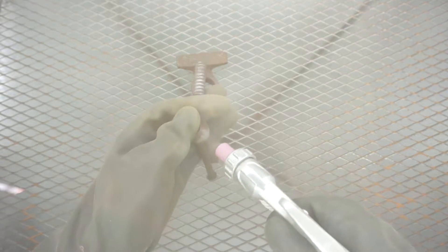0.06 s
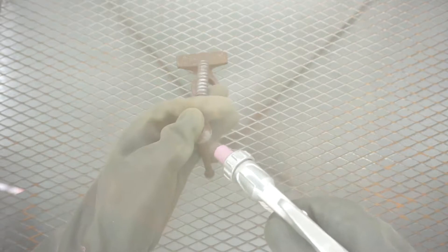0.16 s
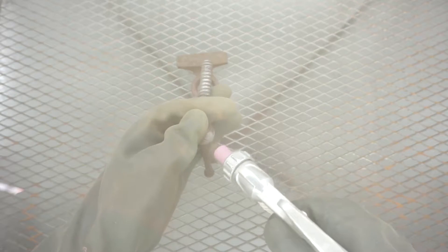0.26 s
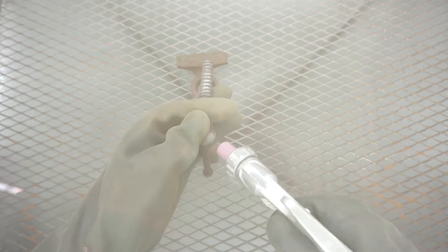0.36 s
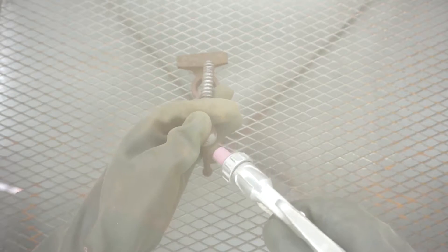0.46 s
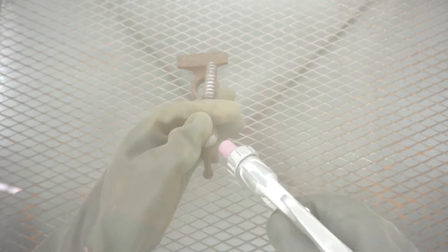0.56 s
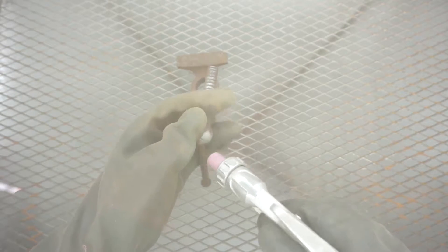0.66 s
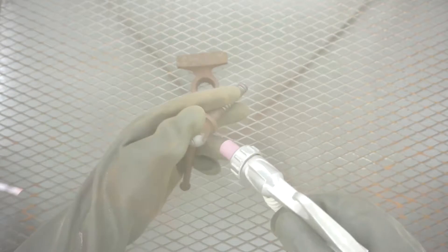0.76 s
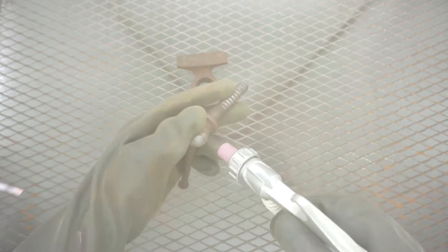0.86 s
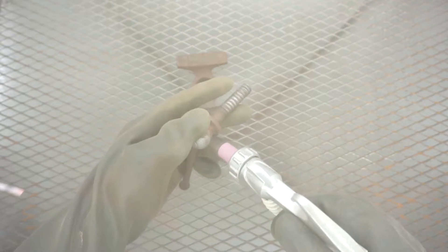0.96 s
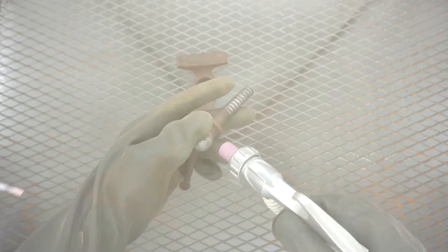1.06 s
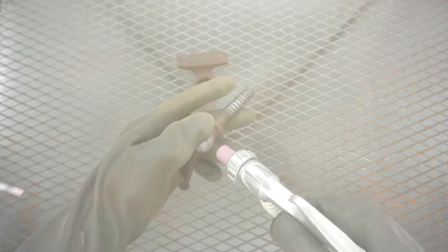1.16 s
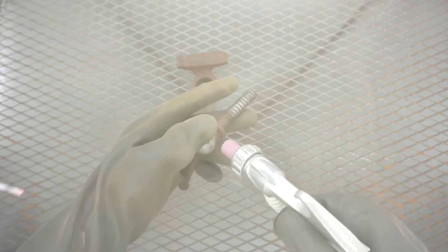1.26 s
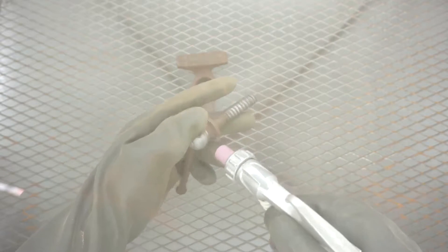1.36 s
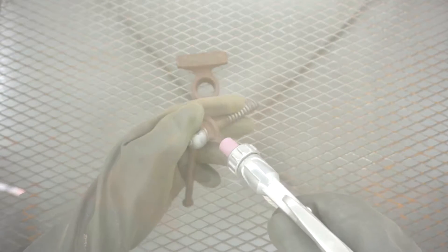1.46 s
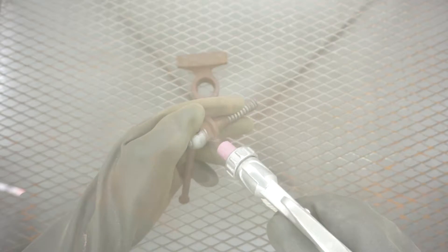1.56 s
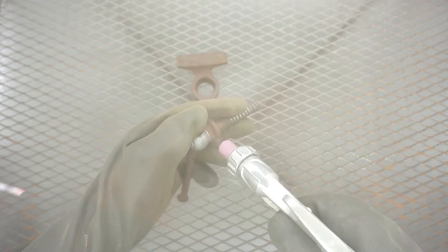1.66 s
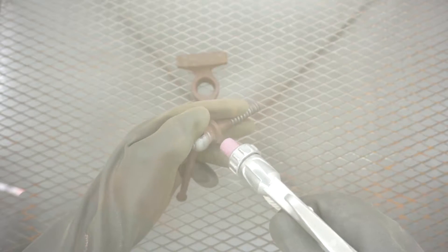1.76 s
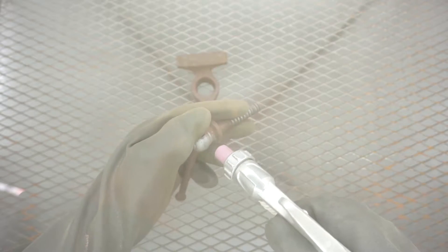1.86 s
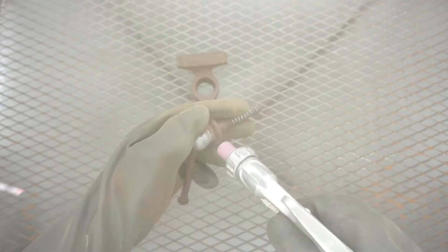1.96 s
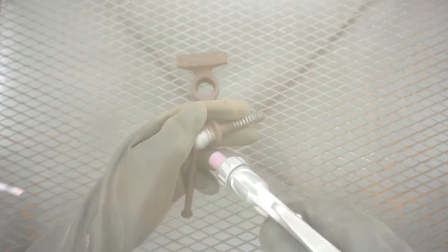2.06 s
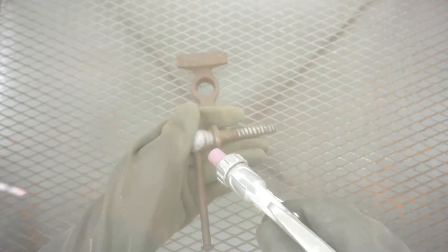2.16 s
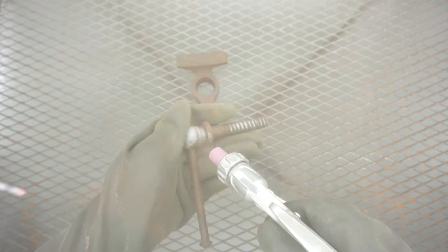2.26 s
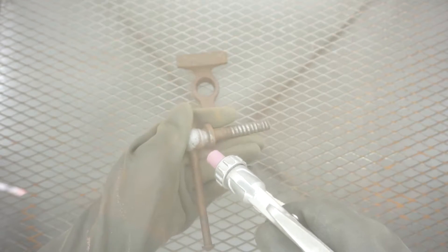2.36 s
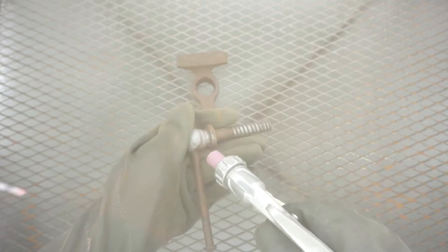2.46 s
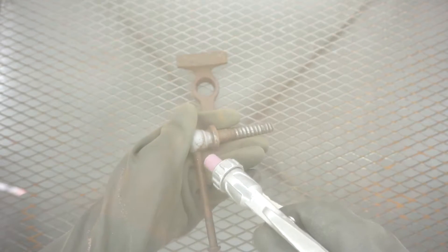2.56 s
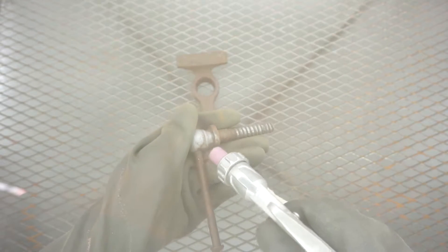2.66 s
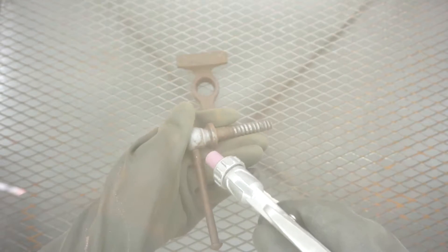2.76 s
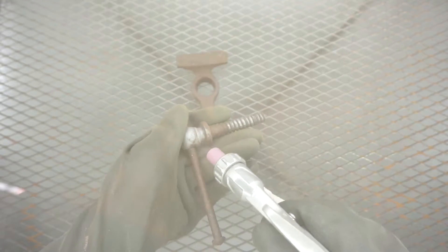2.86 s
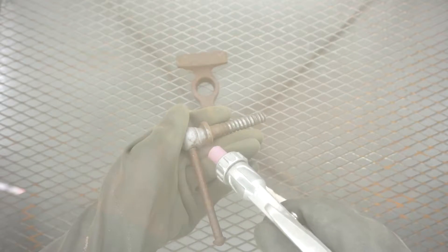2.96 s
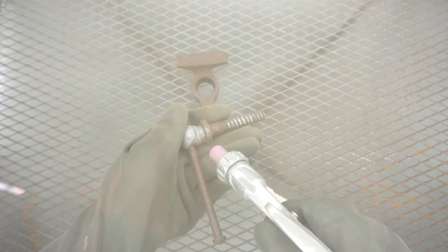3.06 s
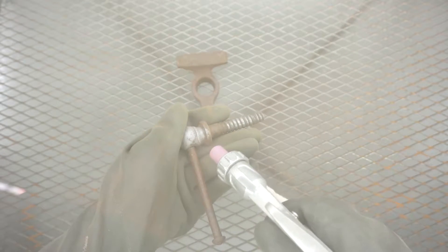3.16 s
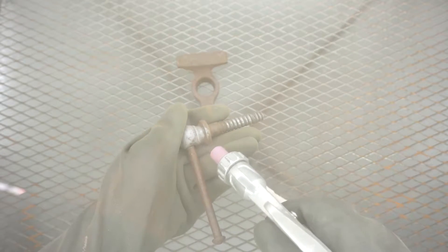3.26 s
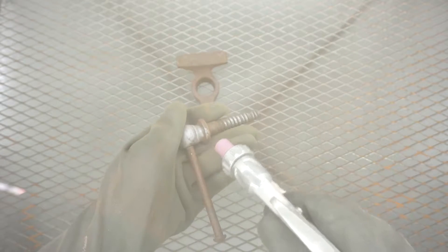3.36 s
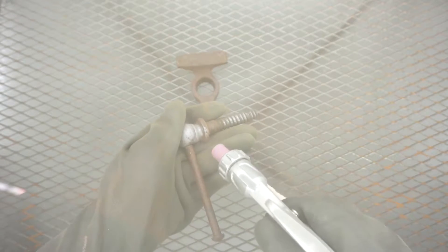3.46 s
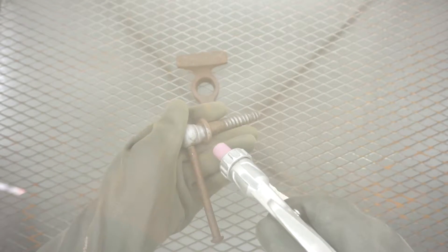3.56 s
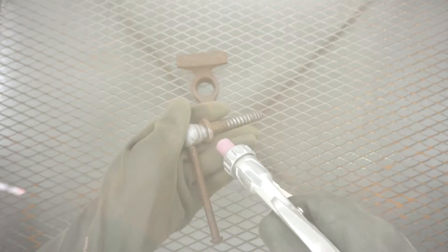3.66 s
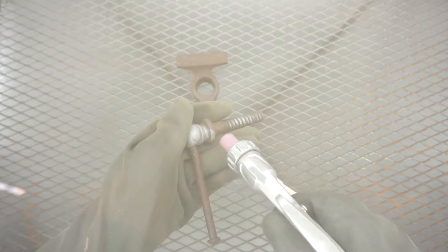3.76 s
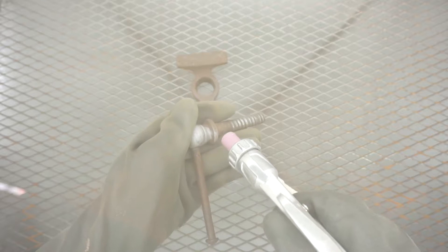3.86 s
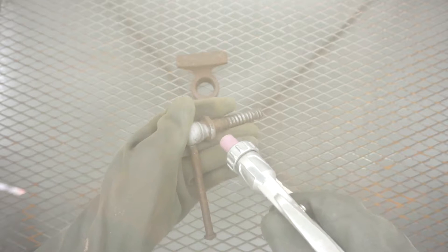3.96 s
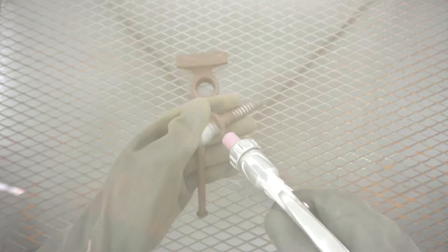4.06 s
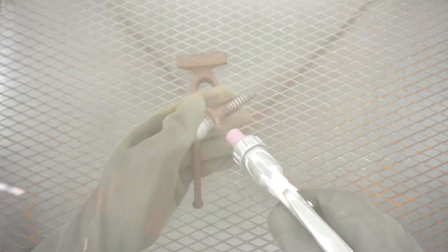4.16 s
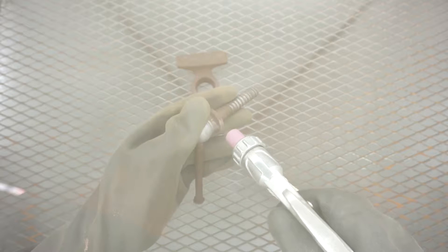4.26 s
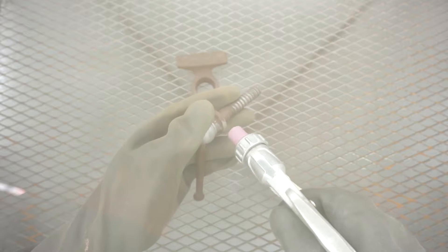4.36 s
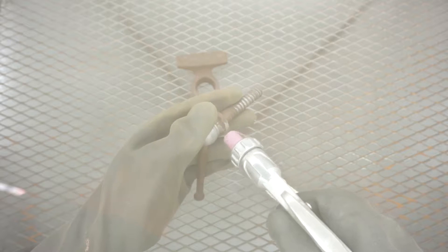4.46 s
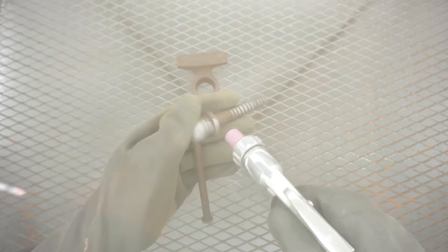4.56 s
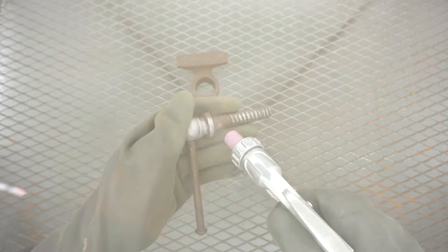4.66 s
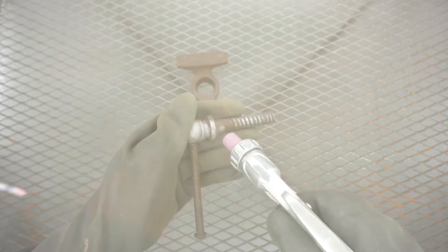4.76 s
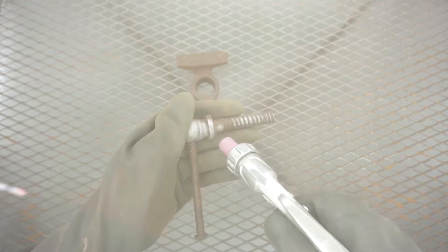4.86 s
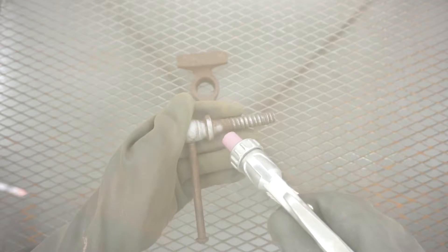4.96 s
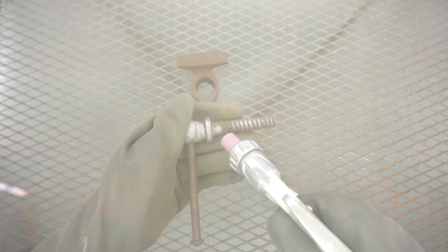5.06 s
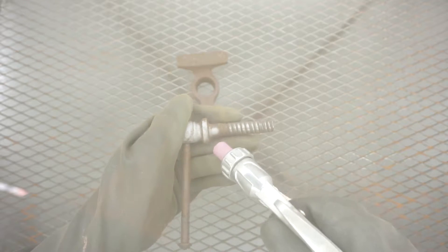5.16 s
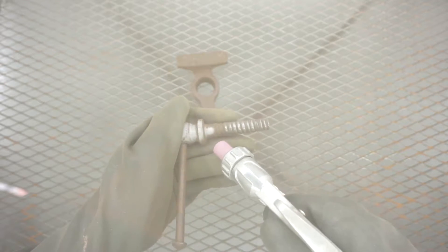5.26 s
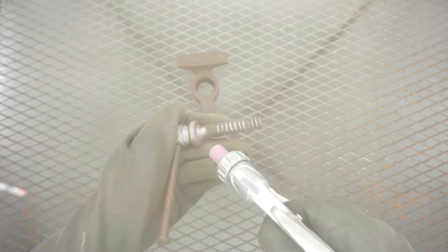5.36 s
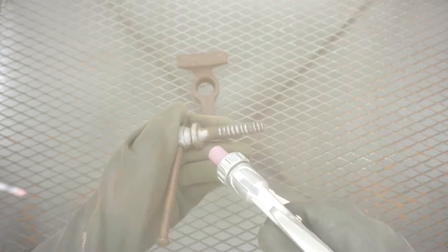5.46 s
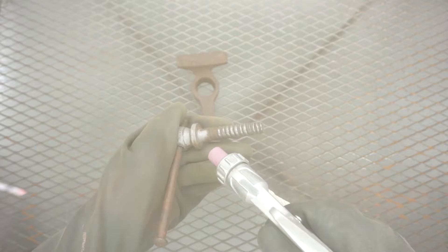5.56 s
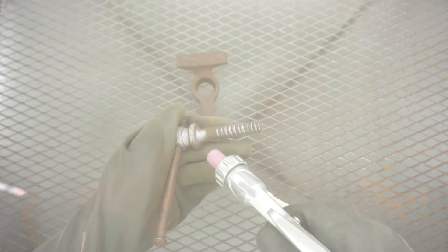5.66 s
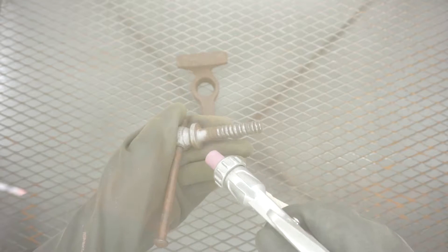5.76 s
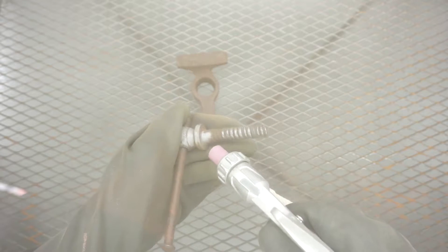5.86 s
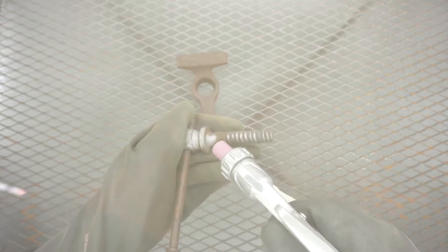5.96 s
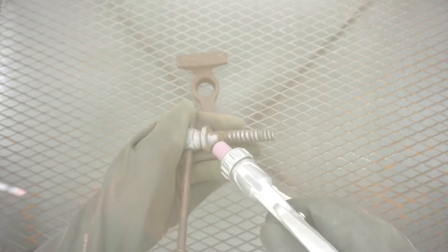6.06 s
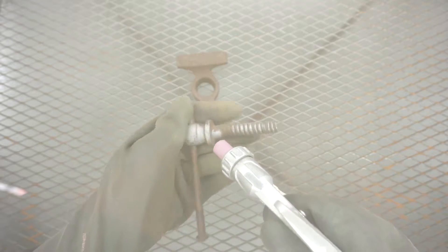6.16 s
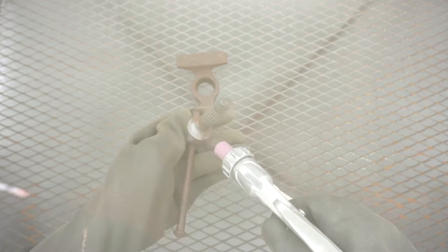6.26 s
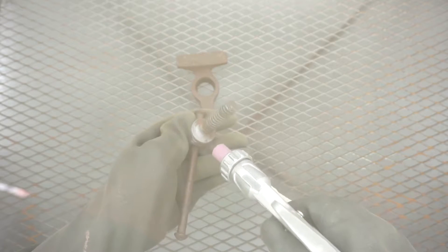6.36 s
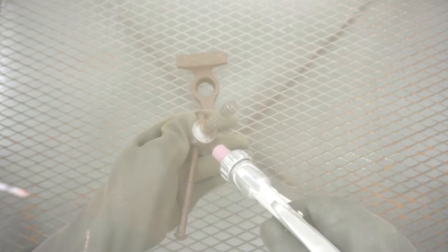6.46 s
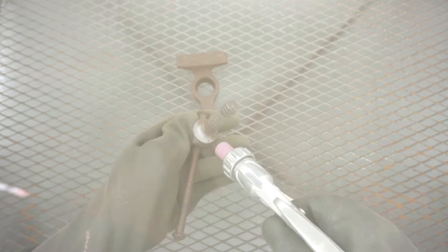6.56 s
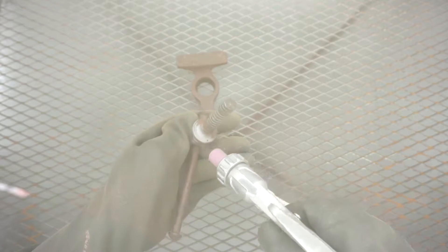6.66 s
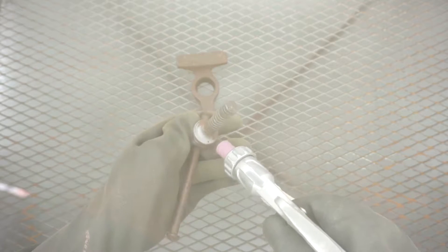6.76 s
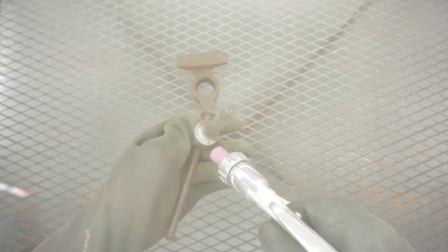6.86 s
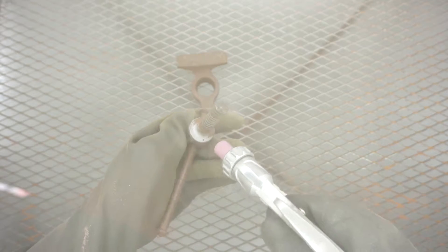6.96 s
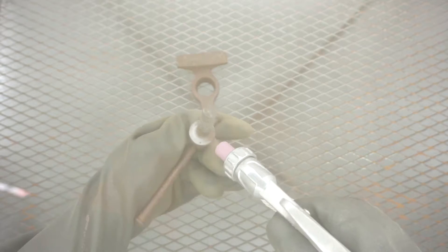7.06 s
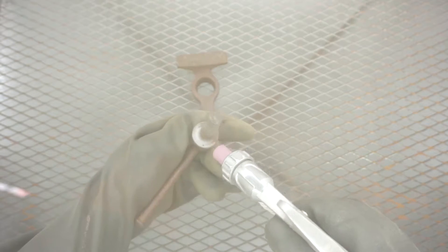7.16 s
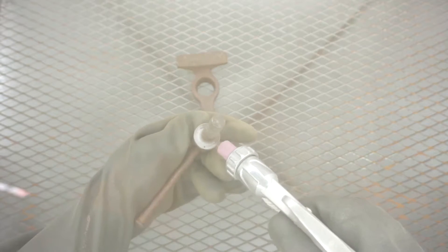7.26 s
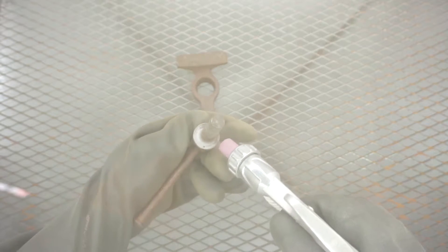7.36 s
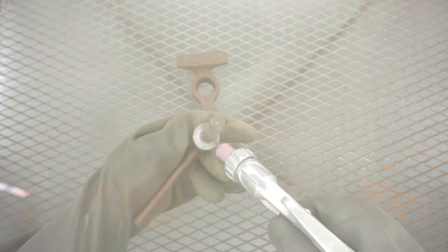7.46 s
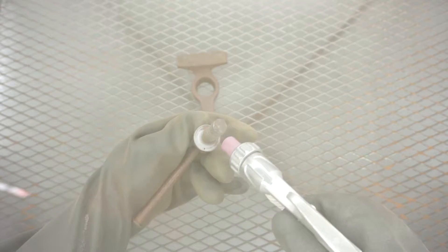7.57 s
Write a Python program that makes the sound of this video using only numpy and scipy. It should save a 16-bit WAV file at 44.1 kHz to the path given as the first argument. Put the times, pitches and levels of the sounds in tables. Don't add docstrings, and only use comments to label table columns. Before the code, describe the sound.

A close stereo pickup of sandblasting: dense high hiss from the nozzle, grit spattering on steel, and a softer rush underneath. The jet comes in joined bursts, each ending in a momentary sag before an abrupt return with a barely audible thud. Sweeps over the part make the splash flare and flicker, with slight whistling and ringing. A low fan and motor hum with dull airflow sits far below, in a small tight steel box.

```python
import sys
import numpy as np
from scipy import signal
from scipy.fft import rfft, irfft, next_fast_len
from scipy.io import wavfile
from scipy.ndimage import uniform_filter1d, map_coordinates

SR = 44100
rng = np.random.default_rng(int(sys.argv[2]) if len(sys.argv) > 2 else 0)


def elevation(decibels):
    levels = np.asarray(decibels, float)
    return 10 ** (levels / 20)


def log_audio(samples):
    frames = np.atleast_2d(samples).T
    limited = np.clip(frames, -1, 1)
    pcm = np.round(limited * 32767).astype(np.int16)
    wavfile.write(sys.argv[1], SR, pcm)


N = 336042
SIZE = next_fast_len(N)
HZ = np.maximum(np.fft.rfftfreq(SIZE, 1 / SR), 1)
T = np.arange(N) / SR
SIDE = np.array([[1], [-1]])


def rms_one(x):
    return x / np.sqrt(np.mean(x ** 2) + 1e-20)


def mid_one(x):
    return x / np.std(x.mean(axis=0))


def at_hz(points, hz):
    table = np.array(points)
    return np.interp(np.log(hz), np.log(table[:, 0]), table[:, 1])


def drift(rate):
    knots = rng.standard_normal(400)
    coarse = map_coordinates(knots, [np.clip(T[::256] * rate + 2, 0, 398)], order=3)
    return np.interp(T, T[::256], coarse)


def cabinet():
    t60_s = 0.14
    echoes = rng.standard_normal((2, SR // 2)) * elevation(-60 * T[:SR // 2] / t60_s)
    return rfft(echoes / np.linalg.norm(echoes, axis=1, keepdims=True), SIZE)


# frequency in Hz, direct share 0-1.
DIRECT_SHARE = [(30, 0.5), (60, 1), (200, 1), (600, 0.84), (1500, 0.77), (4000, 0.33), (5800, 0.37),
                (7000, 0.03), (7600, 0.45), (8600, 0.9), (10000, 0.02), (11500, 0), (14000, 0.13)]
# frequency in Hz, share 0-1.
ECHO_SHARE = [(300, 0.53), (2500, 0.99), (7000, 0.72), (14000, 0.3)]
# frequency in Hz, lag in radians.
LEFT_LAG = [(100, 0.17), (500, 0.77), (1800, 1.2), (2800, 1), (4000, 1.4), (6500, 2.56), (9500, 2.1),
            (14000, 1.9)]
# frequency in Hz, left over right in dB.
LEFT_OVER_RIGHT = [(60, -2), (110, 0), (200, -2), (380, 5.5), (750, 3.5), (1200, 4), (2380, 2.5), (4400, 4),
                   (8120, 3.5), (15000, 4)]


def stereo_noise(walls, rough_db=0, least_direct=0):
    top_hz = 15735
    grit = elevation(rough_db * rms_one(uniform_filter1d(rng.standard_normal(SIZE), 60)))
    shared, *own = rfft(rng.standard_normal((3, SIZE)) * grit)
    direct = np.clip(at_hz(DIRECT_SHARE, HZ), least_direct, 1)
    echo = np.clip(at_hz(ECHO_SHARE, HZ), 0, 1)
    around = np.sqrt(echo) * shared * walls + np.sqrt(1 - echo) * np.array(own)
    straight = shared * np.exp(-.5j * SIDE * at_hz(LEFT_LAG, HZ))
    both = np.sqrt(direct) * straight + np.sqrt(1 - direct) * around
    both = both / np.sqrt(uniform_filter1d(np.abs(both) ** 2, size=800))
    both = both * elevation(SIDE * at_hz(LEFT_OVER_RIGHT, HZ) / 2)
    pair = np.array([both[0] + both[1], both[0] - both[1]]) / 2
    broad = uniform_filter1d(np.abs(pair) ** 2, size=6000)
    fine = uniform_filter1d(np.abs(pair) ** 2, size=350)
    mid, apart = pair * np.sqrt(broad / broad[0] / fine)
    return (mid + SIDE * apart) * (HZ < top_hz)


# time the jet is back in seconds, how long before that it was let go in seconds,
# thud at the join in dB, then in the new burst grit on the part in dB and nozzle hiss in dB.
TRIGGER = [(0.027, 0.041, -88, 0, -1), (0.761, 0.044, -53, -2.5, -0.5), (1.479, 0.051, -73, 0, -1),
           (2.2291, 0.053, -84, -2.5, -1), (2.8967, 0.034, -64, -0.5, -1), (3.497, 0.052, -72, -1, -1.5),
           (4.1313, 0.05, -54, 0, -1.5), (4.666, 0.012, -73, -1.5, -0.5), (5.3664, 0.042, -64, -1, -0.5),
           (6.2497, 0.056, -71, -3.5, -1.5), (7.0844, 0.042, -78, -4, -1)]


def let_go():
    early_s = 0.004
    out = np.zeros(N)
    for back, lead, *_ in TRIGGER:
        lead = lead + early_s
        out = np.where((T > back - lead) & (T < back), T - back + lead, out)
    return out


# time in seconds, half length in seconds,
# more splash in dB, more rush and ringing in dB.
PASSES = [(0.41, 0.033, 4, 1.5), (0.67, 0.071, 0.5, -1.5), (0.897, 0.058, 3, 4.5), (1.184, 0.027, 5.5, 4.5),
          (1.343, 0.036, 5.5, 8.5), (1.82, 0.036, 6.5, 4), (2.034, 0.023, 2, 3.5), (2.393, 0.057, 1.5, 3.5),
          (2.743, 0.03, 2.5, 4.5), (3.095, 0.024, 5, 3.5), (3.297, 0.12, 2.5, 3), (3.774, 0.093, 4, 4.5),
          (3.957, 0.064, 5.5, 4.5), (4.504, 0.032, 4, 1.5), (5.13, 0.099, 3, 5.5), (5.604, 0.098, 1, 2),
          (6.075, 0.18, 0.5, 3), (6.495, 0.12, 1, 1), (6.68, 0.07, -0.5, 0), (6.96, 0.14, 2.5, 3.5),
          (7.456, 0.44, 5.5, 9)]


def aim():
    kick_db, kick_s = 2, 0.021
    build_up_db, build_up_s = 2, 0.083
    back, _, _, grit_db, hiss_db = np.transpose(TRIGGER)
    burst = np.maximum(np.searchsorted(back, T) - 1, 0)
    since = np.maximum(T - back[burst], 0)
    pressure_db = kick_db * np.exp(-since / kick_s) - build_up_db * np.exp(-since / build_up_s)
    coarse = T[::128]
    swell = np.zeros((2, len(coarse)))
    for s, half, splash_db, rush_db in PASSES:
        swell += np.outer([splash_db, rush_db], np.exp(-.5 * ((coarse - s) / half) ** 2))
    swell = np.array([np.interp(T, coarse, row) for row in swell])
    splash_db, rush_db = grit_db[burst] + pressure_db + swell
    return hiss_db[burst] + pressure_db, splash_db, rush_db


# time in seconds, edge tone in dB, more face turned to the jet in dB.
HOLD = [(0, -67, -2), (.4, -56.5, -2.5), (1.0, -68, 1.5), (1.5, -76, 0), (1.9, -58, -1.5), (2.4, -62, 0),
        (2.8, -59.5, -2.5), (3.1, -58, -1.5), (3.6, -53, -1), (3.95, -56.5, 0), (4.3, -61, -1),
        (4.62, -58, 0), (4.7, -58, -1), (4.93, -57, -2), (5.1, -57, -1.5), (5.5, -58.5, -1.5),
        (6.2, -57.5, 1), (6.7, -73, 0), (7.1, -65, -6.5)]


def held(column):
    hold = np.array(HOLD)
    return np.interp(T, hold[:, 0], hold[:, column])


FAN_HZ = 57.02
# multiple of the fan's turning rate, level in dB, left-right balance in dB.
FAN = [(2, -95, 1.5), (3, -91.5, -2), (4, -82.5, 2.5), (5, -80, 1), (6, -75, -5), (7, -71, 2.5),
       (8, -85.5, 10.5), (9, -85, -16), (10, -84, -3), (11, -73, -3), (13, -81, -1), (14, -85, -11),
       (15, -91.5, -13), (18, -104, -17), (19, -100.5, -2), (20, -99, -14)]
# frequency in Hz, level in dB.
MOTOR_LINES = [(183, -89.5), (706, -82), (904, -85.5)]


def fan_and_motor():
    skipped_s = np.cumsum(rng.uniform(0, 1, len(TRIGGER) + 1))
    burst = np.searchsorted(np.array(TRIGGER)[:, 0], T)
    turn = 2 * np.pi * (T + skipped_s[burst])
    lines = [(k * FAN_HZ, db, pan_db) for k, db, pan_db in FAN]
    lines += [(hz, db, 0) for hz, db in MOTOR_LINES]
    out = 0
    for hz, db, pan_db in lines:
        tone = np.cos(hz * turn + rng.uniform(0, 2 * np.pi) - SIDE / 2 * at_hz(LEFT_LAG, hz))
        level = elevation(db + 2.0 + 1.0 * drift(5))
        out = out + np.sqrt(2) * elevation(SIDE / 2 * pan_db) * level * tone
    return out


# frequency in Hz, level in dB per Hz.
AIRFLOW = [(25, -36), (45, -26), (65, -23), (140, -20.5), (260, -23), (310, -6), (380, 2), (430, -11),
           (600, -10.5), (705, -5), (800, -12), (950, -10.5), (1150, -37), (1600, -17)]


def airflow(walls, rush_db):
    follows = 0.83
    air = mid_one(irfft(stereo_noise(walls) * elevation(at_hz(AIRFLOW, HZ)), SIZE)[:, :N])
    stirred = rush_db + held(column=2)
    return elevation(-66 + follows * (stirred - stirred.mean()) + 0.46 * drift(8.2)) * air


def extractor(walls, rush_db):
    return fan_and_motor() + airflow(walls, rush_db)


def hum_gain_db(fading):
    back = np.array(TRIGGER)[:, 0]
    since = T - np.append(-1, back)[np.searchsorted(back, T)]
    opening_db = np.minimum(90 * fading, 3.0)
    ducking_db = 3.9 * np.exp(-since / 0.04)
    return uniform_filter1d(opening_db - ducking_db, 90)


def splices():
    out = np.zeros(N)
    for s, lead, thud_db, *_ in TRIGGER:
        near = slice(round((s - .01) * SR), round((s + .01) * SR))
        out[near] += elevation(thud_db - 15.0) * np.exp(-.5 * ((T[near] - s) / .0012) ** 2)
        out[round(s * SR):][:2] += elevation(lead * 400 - 62) * np.array([1, -1])
    return out


def standing_waves():
    depth_db, spacing_hz = 3.5, 45
    count = round(SR / 2 / spacing_hz)
    heights = rng.standard_normal(count + 1)
    return elevation(depth_db * np.interp(HZ / spacing_hz, np.arange(count + 1), heights))


def patchy_band(noise, lo_hz, hi_hz, patchy_db, together, tilt_db=0):
    edges = np.geomspace(lo_hz, hi_hz, num=4)
    step = np.log(edges[1] / edges[0])
    out = 0
    for k, centre in enumerate(np.sqrt(edges[1:] * edges[:-1])):
        strip = noise * np.cos(np.pi / 2 * np.clip(np.log(HZ / centre) / step, -1, 1))
        ridges = standing_waves()
        first = irfft(strip * ridges, SIZE)[:, :N]
        second = irfft(strip / ridges, SIZE)[:, :N]
        turned = np.clip(.5 + .9 * drift(1.5), 0, 1)
        level = elevation(patchy_db * (together + drift(14)) + (2 - k) * tilt_db)
        out = out + ((1 - turned) * first + turned * second) * level
    return mid_one(out)


def resonances(noise, modes):
    power = 0
    for hz, width, db in modes:
        power = power + elevation(2 * db) / width / (1 + (2 * (HZ - hz) / width) ** 2) ** 2
    return mid_one(irfft(noise * np.sqrt(power), SIZE)[:, :N])


# frequency in Hz, width in Hz, level in dB.
STEEL = [(1215, 17, 0), (1418, 16, -7), (1495, 26, -3), (1567, 19, 0), (1636, 12, -6), (1781.3, 34, 10),
         (1824, 23, -0.5), (1884, 13, 0.5), (1930, 22, -3), (2108, 23, -2.5), (2235, 30, -15)]


def ringing_steel(noise, low_db, fading):
    return elevation(-69.5 + low_db + 3.0 - 250 * fading + 0.2 * drift(9.5)) * resonances(noise, STEEL)


SPLASH_FADE_DB_S = 345
# frequency in Hz, width in Hz, level in dB.
EDGE_TONE = [(7000, 120, 0), (7090, 160, -1)]


def edge_whistle(noise, fading):
    level_db = held(column=1) + 0.83 * drift(7.0) - SPLASH_FADE_DB_S * fading
    return elevation(level_db) * resonances(noise, EDGE_TONE)


def rush(noise, together, low_db, fading):
    return elevation(-63.5 + low_db - 4.0 - 170 * fading) * patchy_band(noise, 730, 2037, 0.79, together)


# frequency in Hz, width in Hz, level in dB.
SPLASH_BANDS = [(2110, 52, -10), (2396, 40, -4.5), (2730, 47, -7), (2930, 33, -4), (2970, 31, -12),
                (3073, 25, -8.5), (3330, 28, -7), (3602, 28, 3.5), (3900, 93, 1), (4060, 130, 2.5),
                (4470, 120, 2.5), (5200, 100, 5), (5360, 86, 5), (5690, 140, 7), (5846, 58, 8),
                (6300, 170, -1.5), (7550, 140, -14)]


def splash(noise, other, together, high_db, fading):
    tilt_db = 0.15 * (high_db - high_db.mean())
    impacts = patchy_band(noise, 2286, 7200, 0.45, together, tilt_db)
    narrow_bands = elevation(-6.5 + 1.9 * drift(6.7)) * resonances(other, SPLASH_BANDS)
    level_db = -51.5 + 0.54 * high_db - 1.5 - SPLASH_FADE_DB_S * fading
    return elevation(level_db) * (impacts + narrow_bands)


# frequency in Hz, width in Hz, level in dB.
NOZZLE_BAND = [(13650, 350, -2), (14000, 700, 0)]


def nozzle_hiss(noise, other, together, nozzle_db, high_db, fading):
    spray = patchy_band(noise, 7330, 16180, 0.35, together)
    nozzle = elevation(-12 + 2.3 * drift(0.33)) * resonances(other, NOZZLE_BAND)
    fade_db = 346 * fading + 1700 * fading ** 2
    return elevation(-43 + nozzle_db + 0.062 * high_db + 1.0 - fade_db) * (spray + nozzle)


# frequency in Hz, level in dB per Hz.
JET = [(700, -29), (950, -30), (1400, -25), (2200, -16.5), (3000, -15.5), (4500, -14), (5500, -10),
       (6200, -11), (6700, -7), (7300, -8), (8500, -10.5), (9200, -9.5), (9700, -6), (11000, -4),
       (12600, -4.5), (13700, -1.0), (14600, -1.5), (15700, 1)]
# frequency in Hz, width in Hz, change in dB.
DIPS_AND_LIFTS = [(2570, 40, -2), (2687, 51, -6), (3530, 150, -4), (3640, 110, 0.5), (4060, 40, 4), (5350, 43, -7),
                  (6120, 200, 3.5)]


def jet(fading, walls, aimed):
    nozzle_db, high_db, low_db = aimed
    face_db = held(column=2)
    high_db, low_db = high_db + 0.77 * face_db, low_db + 1.0 * face_db
    colour_db = at_hz(JET, HZ)
    for hz, width, db in DIPS_AND_LIFTS:
        colour_db = colour_db + db * np.exp(-.5 * (2 * (HZ - hz) / width) ** 2)
    noise = stereo_noise(walls, rough_db=1.2) * elevation(colour_db)
    other = stereo_noise(walls, least_direct=0.59)
    together = 1.7 * drift(7.2)
    out = ringing_steel(other, low_db, fading) + edge_whistle(other, fading)
    out = out + rush(noise, together, low_db, fading)
    out = out + splash(noise, other, together, high_db, fading)
    return out + nozzle_hiss(noise, other, together, nozzle_db, high_db, fading)


def scene():
    fading, walls, aimed = let_go(), cabinet(), aim()
    background = elevation(hum_gain_db(fading)) * extractor(walls, aimed[2])
    return background + splices() + jet(fading, walls, aimed)


def top_cut(x):
    return signal.sosfilt(signal.butter(12, 16600, fs=SR, output="sos"), x)


def record(dry):
    low_pass = signal.butter(20, 16500, fs=SR, output="sos")
    mix = signal.sosfiltfilt(low_pass, dry)
    return top_cut(mix)


dry = scene()
out = record(dry)
log_audio(out)
```